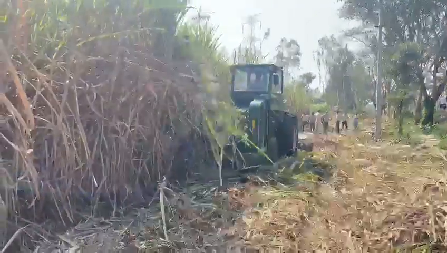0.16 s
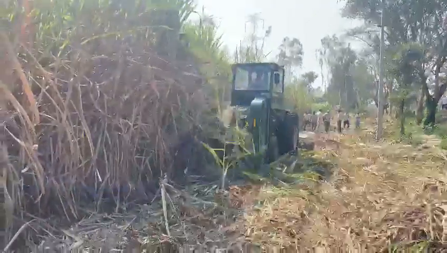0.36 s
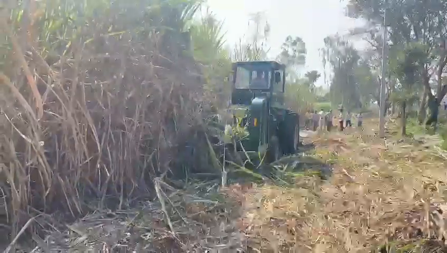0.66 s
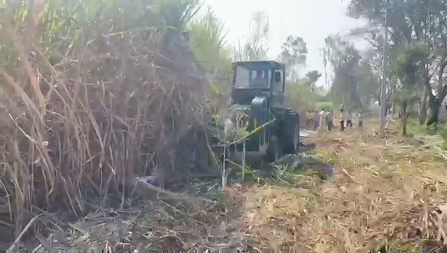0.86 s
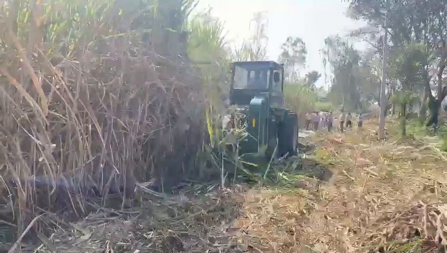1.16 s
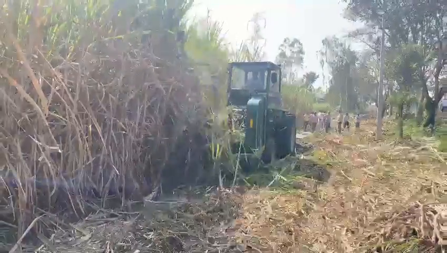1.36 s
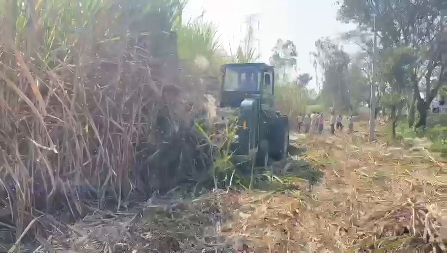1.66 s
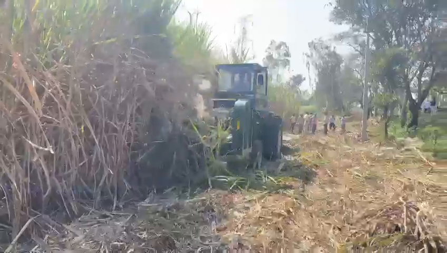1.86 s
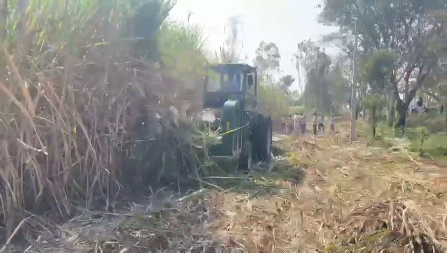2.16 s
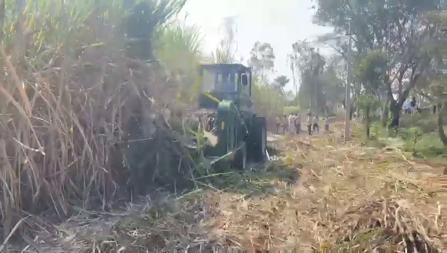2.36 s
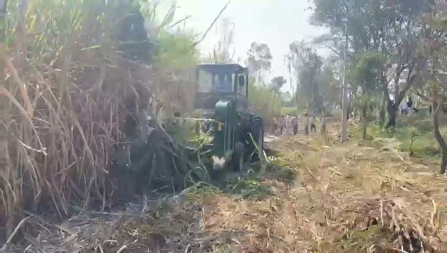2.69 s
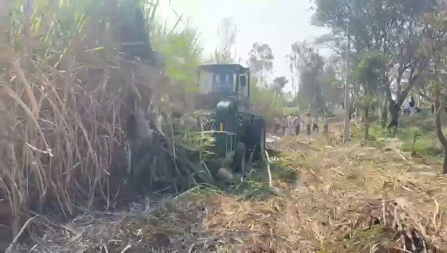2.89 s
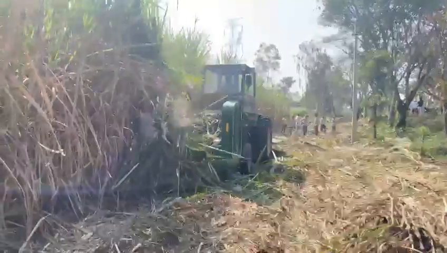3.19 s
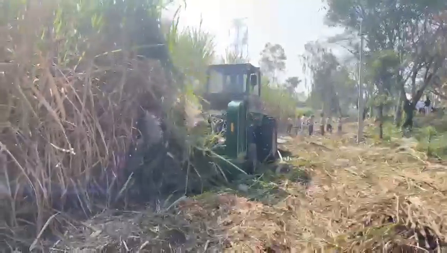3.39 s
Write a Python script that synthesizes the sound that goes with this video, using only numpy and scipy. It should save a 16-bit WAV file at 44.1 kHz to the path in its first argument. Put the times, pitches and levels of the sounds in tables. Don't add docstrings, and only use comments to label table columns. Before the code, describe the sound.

A cane harvester's diesel engine drones and roars without pause in an open field, gears whining, as stalks clack against steel and dry leaves hiss; heard in stereo on a phone some thirty metres away.

```python
import sys
import numpy as np
from scipy import signal
from scipy.fft import rfft, irfft
from scipy.io import wavfile
from scipy.ndimage import uniform_filter1d, map_coordinates

SR = 44100
rng = np.random.default_rng(int(sys.argv[2]) if len(sys.argv) > 2 else 0)


def linear_from_db(decibels):
    return 10 ** (np.asarray(decibels, float) / 20)


def wrap_up_sound(samples):
    columns = np.atleast_2d(samples).T
    tamed = np.clip(columns, -1, 1)
    steps = np.round(tamed * 32767).astype(np.int16)
    wavfile.write(sys.argv[1], SR, steps)


N = 156114

# multiple of firing rate, level in dB, wander in dB.
ORDERS = [(1, -27.5, -1.5), (4, -43, 1.5)]
# time in seconds, second order, third order and gear whine in dB.
LOAD = [(0.0, -23.5, -30, -28), (0.3, -22.5, -34, -34), (0.72, -22.5, -27.5, -32), (0.97, -41, -35, -30),
        (1.26, -25, -45, -31.5), (1.31, -33, -32, -51), (1.44, -24, -25.5, -22.5), (1.55, -32, -32, -32),
        (1.92, -34.5, -24, -30), (2.18, -21.5, -42, -37), (2.26, -34, -37, -21), (2.32, -32, -54, -45),
        (2.39, -24.5, -27, -31), (2.47, -26.5, -44, -43), (2.58, -26, -35, -40), (3.31, -25, -45, -41),
        (3.41, -25, -42, -30), (3.54, -48, -57, -51)]
# frequency in Hz, level in dB, wander in dB.
PUMPS = [(385.3, -31.5, 1.2), (806.6, -41.5, 1.5)]
# frequency in Hz, density in dB per Hz.
ROAR_COLOUR = [(30, -18), (55, -5.5), (130, -4), (300, -11), (900, -14), (2000, -9), (2700, -27.5),
               (6000, -51)]
# frequency in Hz, width in Hz, gain in dB.
HOUSING_MODES = [(166, 33, 3), (559, 87, 4.5), (645, 96, 6.5), (980, 132, 4.5), (1900, 780, -7.5)]
# start in seconds, peak in dB, ring in Hz.
STALK_KNOCKS = [(0.151, -11, 920), (0.229, -16, 1220), (0.3, -2, 1010), (0.544, -26, 850),
                (1.008, -28, 1270), (1.103, -30, 1130), (1.452, -9, 1770), (1.694, -8, 1650),
                (1.811, -10, 1440), (1.966, -11.5, 1040), (2.037, -11, 850), (2.102, -10.5, 1410),
                (2.14, -10, 600), (2.373, -12.5, 910), (2.502, -32, 925), (2.523, -13, 990),
                (2.648, -24, 960), (2.806, -9, 1450), (2.85, -8, 645), (2.955, -17, 814),
                (3.067, -18, 1050)]
# time in seconds, level in dB.
CROP_FEED = [(0.0, -38), (0.04, -41), (0.66, -43), (0.84, -43), (0.85, -41), (1.2, -44), (1.65, -37),
             (1.72, -39.5), (1.8, -35), (1.85, -38.5), (2.71, -36), (2.78, -40), (2.88, -32), (2.89, -38),
             (3.22, -36.5), (3.27, -41), (3.32, -36), (3.54, -38)]
# frequency in Hz, density in dB per Hz.
LEAF_COLOUR = [(700, -47), (1600, -19), (3000, 1.5), (4500, -2), (6000, -2), (8500, -6.5), (11000, -6.5),
               (13000, -16.5)]
# time in seconds, share of rattle 0-1, share of rustle 0-1.
CUTTER_FOCUS = [(0, .8, 1), (.1, 1, 1), (.3, .65, 1), (.7, .6, .95), (.82, .95, .9), (.95, .55, .9),
                (1.1, .8, 1), (1.36, .6, 1), (1.42, 1, 1), (1.64, 1, .8), (1.72, .8, .4), (2.2, .5, .45),
                (2.3, .45, .9), (3.0, .45, .9), (3.15, .9, .55), (3.3, .6, .4), (3.39, 1, .4),
                (3.54, 1, .4)]
# frequency in Hz, share 0-1.
MACHINE_SHARED = [(60, 0.91), (450, 1), (1000, 0.71), (2500, 0.33)]
# frequency in Hz, share 0-1.
CROP_SHARED = [(2500, 0.5), (3300, 0.48), (4200, 0.41), (5600, 0.64), (7000, 0.63), (9000, 0.79)]
# frequency in Hz, lead of the left port in half turns.
CROP_LEAD = [(1100, 0), (2250, .6), (2550, 1), (2900, 1.55), (3900, 2), (5100, 2.8), (6050, 3.2), (6700, 4),
             (8400, 4.8), (9600, 5.15), (10500, 6)]
# frequency in Hz, left minus right in dB.
BODY_SHADE = [(60, -2), (300, -2.5), (700, -4), (1200, 0), (2000, -5), (2700, 7.5), (3800, -1.5), (6000, 1)]
# time in seconds, left minus right in dB.
HAND_TURN = [(0, -1), (1.1, -1), (1.9, -0.8), (3.54, -0.3)]
# frequency in Hz, dB under the louder of mid and side.
STEREO_FLOOR = [(300, 26), (1000, 14), (2600, 6), (4800, 0), (8000, 0), (12000, 2)]

FIRING_HZ, GEAR_HZ, GEAR_FLUTTER_DB, WHINE_JITTER = 50.4, 558, 3, .000995
ROAR_DB, CYCLE_DEPTH, CHOP_HZ, CHOP_DB = -20.5, .06, 8.2, 1.1
KNOCK_TRIM_DB, KNOCK_T60_S, PUSH_S = -4.5, .024, .0005
OVERTONE_RATIO, OVERTONE_DB, CRACK_DB, CRACK_T60_S = 2.06, -2.5, -4, .014
LEAVES_DB, HISS_DB, GRAINS_PER_S, GRAIN_SPREAD_DB = 14.5, -1.5, 5000, 2.5
FEED_FULL_OCTAVE, FEED_LOW_SHARE = 12.82, .3
RATTLE_TOP_HZ, RUSTLE_TOP_HZ = 6300, 7900
HISS_FOCUS, CLEARS_S = .78, 1.78
MACHINE_LAG_S, LAG_WOBBLE_S = .00009, .000003
RUMBLE_CUT_HZ, TOP_HZ, MONO_ABOVE_HZ = 30, 11850, 10300
FRAME, GRID, BAND_BINS, FLOOR_JITTER_DB = 1024, 152, 20, 6


def level(x, db):
    return x * linear_from_db(db) / np.sqrt(np.mean(x ** 2))


def over_hz(table):
    hz, value = np.array(table, float).T
    return np.interp(np.log(np.fft.rfftfreq(N, 1 / SR) + 1), np.log(hz), value)


def over_time(table, column=1):
    rows = np.array(table, float)
    return np.interp(np.arange(N) / SR, rows[:, 0], rows[:, column])


def walk(rate_hz):
    hold = int(SR / rate_hz)
    steps = np.repeat(rng.standard_normal(N // hold + 1), hold)
    return 1.19 * uniform_filter1d(uniform_filter1d(steps, hold), hold)[:N]


def flicker(x, gain, shared_db, own_db, rate_hz, swell_db=0):
    octave = np.log2(np.fft.rfftfreq(N, 1 / SR) + 1)
    spec, out = rfft(x) * gain, 0
    for centre in np.arange(4.5, 14.5, .5):
        band = np.cos(np.pi * np.clip(octave - centre, -.5, .5)) ** 2
        swell = swell_db * np.clip(1 + centre - FEED_FULL_OCTAVE, FEED_LOW_SHARE, 1)
        out = out + irfft(spec * band, N) * linear_from_db(shared_db + swell + own_db * walk(rate_hz))
    return out


def tone(turns, db):
    return np.sqrt(2) * linear_from_db(db) * np.sin(2 * np.pi * (turns + rng.random()))


def roar(turns):
    f = np.fft.rfftfreq(N, 1 / SR)
    colour_db = over_hz(ROAR_COLOUR)
    for hz, width, db in HOUSING_MODES:
        colour_db = colour_db + db / (1 + (2 * (f - hz) / width) ** 2)
    puffs = rng.standard_normal((3, N)) * (1 + CYCLE_DEPTH * np.cos(2 * np.pi * turns))
    chop = np.cos(2 * np.pi * np.cumsum(CHOP_HZ * (1 + .06 * walk(2.81))) / SR)
    chop_db = CHOP_DB * chop + .11 * walk(3.0)
    return level(flicker(puffs, linear_from_db(colour_db), chop_db, 1.24, 9), ROAR_DB)


def diesel(turns):
    out = tone(2 * turns, over_time(LOAD) - .6 + .68 * walk(15))
    out = out + tone(3 * turns, over_time(LOAD, 2) - 3.0 + walk(9.6))
    for multiple, db, wander_db in ORDERS:
        out = out + tone(multiple * turns, db + wander_db * walk(5.6))
    return out


def whines():
    gear_turns = np.cumsum(GEAR_HZ * (1 + 2 * WHINE_JITTER * walk(5.12))) / SR
    out = tone(gear_turns, over_time(LOAD, 3) - 1.5 + GEAR_FLUTTER_DB * walk(18))
    for hz, db, wander_db in PUMPS:
        pump_turns = np.cumsum(hz * (1 + WHINE_JITTER * walk(2.93))) / SR
        out = out + tone(pump_turns, db + wander_db * walk(4.8))
    return out


def knocks():
    t = np.arange(4096) / SR
    out = np.zeros(N + len(t))
    shape = (1 - np.exp(-t / PUSH_S)) * linear_from_db(-60 * t / KNOCK_T60_S)
    crack_band = signal.butter(1, [700, 2600], "band", fs=SR, output="sos")
    for start_s, db, hz in STALK_KNOCKS:
        ring = np.sin(2 * np.pi * hz * t)
        ring += linear_from_db(OVERTONE_DB) * np.sin(2 * np.pi * OVERTONE_RATIO * hz * t)
        crack = level(signal.sosfilt(crack_band, rng.standard_normal(len(t))), CRACK_DB)
        hit = ring * shape / shape.max() + crack * linear_from_db(-60 * t / CRACK_T60_S)
        start = int(start_s * SR)
        out[start:start + len(t)] += linear_from_db(db + KNOCK_TRIM_DB) * hit
    return out[:N]


def leaves():
    hit = rng.random((3, N)) < GRAINS_PER_S / SR
    size = linear_from_db(GRAIN_SPREAD_DB * rng.exponential(size=(3, N)))
    crackle = hit * rng.choice([-1, 1], (3, N)) * size
    mix = level(crackle, 0) + level(rng.standard_normal((3, N)), HISS_DB)
    feed_db = over_time(CROP_FEED)
    mean_db = feed_db.mean()
    shared_db = 1.13 * walk(24) + .5 * walk(35.55)
    rustle = flicker(mix, linear_from_db(over_hz(LEAF_COLOUR)), shared_db, .83, 12.02, feed_db - mean_db)
    return level(rustle, LEAVES_DB + mean_db)


def ports(sound, lag_s, alike, lead=((0, 0), (1, 0)), focus=1, band=1):
    share = np.clip(over_hz(alike), 0, 1)
    spec, at = rfft(sound) * band, np.arange(N)
    bend = np.pi / 2 * np.interp(np.fft.rfftfreq(N, 1 / SR), *np.array(lead, float).T)
    direct = []
    for side in (1, -1):
        bent = irfft(np.sqrt(share) * spec[0] * np.exp(1j * side * bend), N)
        direct.append(map_coordinates(bent, [at + side * lag_s * SR / 2], order=3, mode="mirror"))
    scattered = irfft(1j * np.sqrt(share) * spec[1:], N)
    unlike = irfft(np.sqrt(1 - share) * spec[1:], N)
    return np.sqrt(focus) * np.array(direct) + np.sqrt(1 - focus) * scattered + unlike


def scene():
    turns = np.cumsum(FIRING_HZ * (1 + .0015 * walk(1.82))) / SR
    steady = diesel(turns) + whines() + knocks()
    machine = roar(turns) + steady * np.array([[1], [.3], [-.3]])
    heard = ports(machine, MACHINE_LAG_S + np.zeros(N), MACHINE_SHARED)
    crop, lag_s = leaves(), LAG_WOBBLE_S * walk(10)
    hiss_focus = np.where(np.arange(N) < CLEARS_S * SR, HISS_FOCUS, 1)
    part = np.digitize(np.fft.rfftfreq(N, 1 / SR), (RATTLE_TOP_HZ, RUSTLE_TOP_HZ))
    focuses = [over_time(CUTTER_FOCUS), over_time(CUTTER_FOCUS, 2), hiss_focus]
    for k, focus in enumerate(focuses):
        heard = heard + ports(crop, lag_s, CROP_SHARED, CROP_LEAD, focus, part == k)
    return heard


def thin_stereo(x):
    mid_side = np.array([x[0] + x[1], x[0] - x[1]]) / 2
    padded = np.pad(mid_side, ((0, 0), (FRAME - GRID, FRAME)))
    window = signal.windows.kaiser_bessel_derived(2 * FRAME, 4 * np.pi)
    frames = dict(window=window, noverlap=FRAME)
    f, _, bins = signal.stft(padded, SR, nperseg=2 * FRAME, **frames)
    band_rms = uniform_filter1d(np.abs(bins) ** 2, size=3 * BAND_BINS, axis=1)[:, ::BAND_BINS] ** .5
    loudest = band_rms.max(axis=0)
    weaker = band_rms < loudest
    hz, db = np.array(STEREO_FLOOR, float).T
    under_db = np.interp(np.log(f[::BAND_BINS] + 1), np.log(hz), db)[:, None]
    mood = uniform_filter1d(rng.standard_normal(loudest.shape), size=3)
    mood = uniform_filter1d(mood, size=2, axis=0)
    floor = loudest * linear_from_db(FLOOR_JITTER_DB * mood * weaker - under_db)
    kept = bins * (np.abs(bins) > np.repeat(floor, BAND_BINS, axis=1)[:, :len(f)])
    mid, side = signal.istft(kept, SR, **frames)[1][:, FRAME - GRID:][:, :N]
    return np.array([mid + side, mid - side])


def band_limit(x):
    return signal.sosfilt(signal.butter(12, 12890, fs=SR, output="sos"), x)


def record(dry):
    f = np.fft.rfftfreq(N, 1 / SR)
    halves = np.array([[.5], [-.5]])
    rumble, top = (RUMBLE_CUT_HZ / (f + 1)) ** 8, (f / TOP_HZ) ** 150
    edges = 1 / np.sqrt((1 + rumble) * (1 + top)) * (f < 12000)
    spec = rfft(dry * linear_from_db(over_time(HAND_TURN) * halves))
    spec = spec * edges * linear_from_db(over_hz(BODY_SHADE) * halves)
    spec = np.where(f > MONO_ABOVE_HZ, spec.mean(axis=0), spec)
    mix = thin_stereo(irfft(spec, N))
    return band_limit(mix)


dry = scene()
out = record(dry)
wrap_up_sound(out)
```